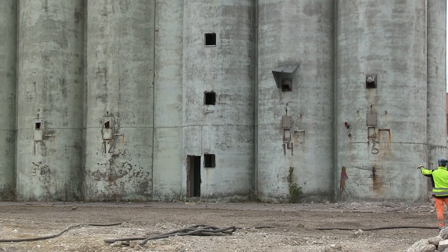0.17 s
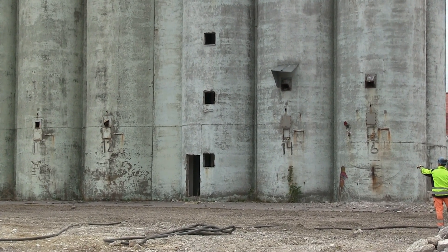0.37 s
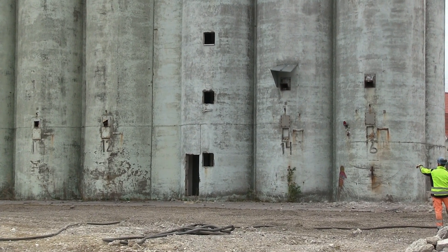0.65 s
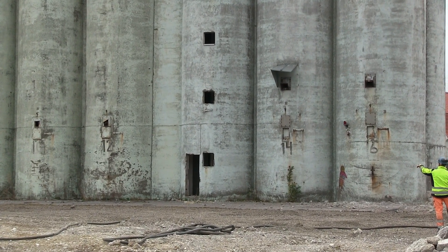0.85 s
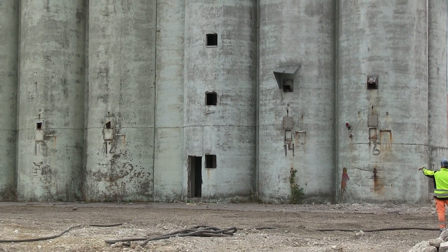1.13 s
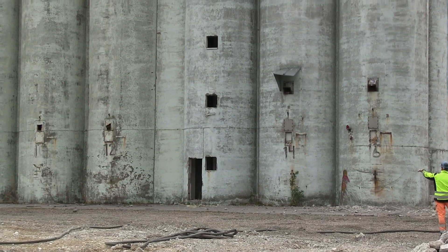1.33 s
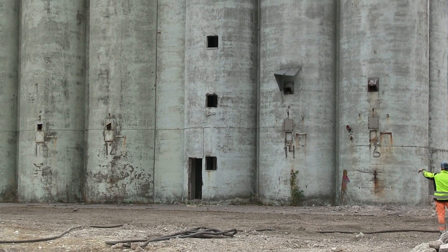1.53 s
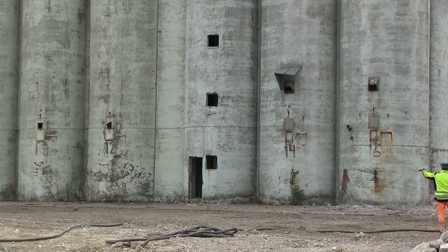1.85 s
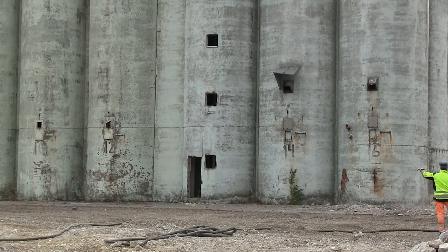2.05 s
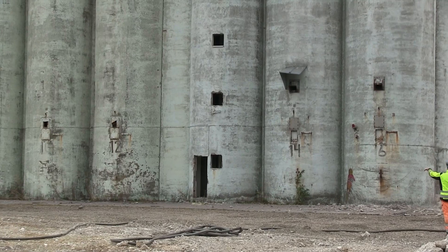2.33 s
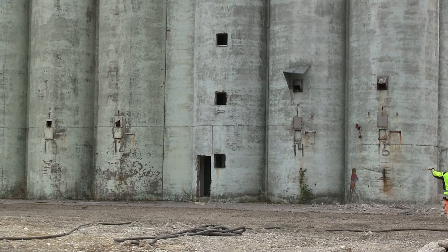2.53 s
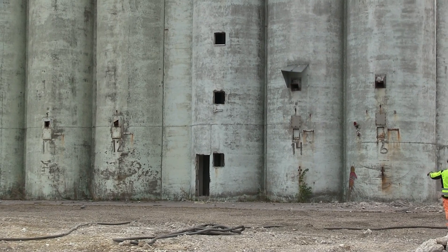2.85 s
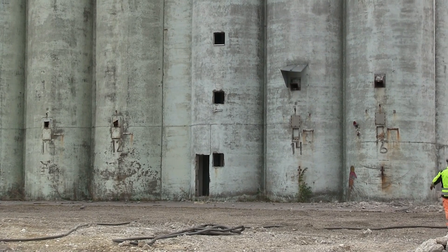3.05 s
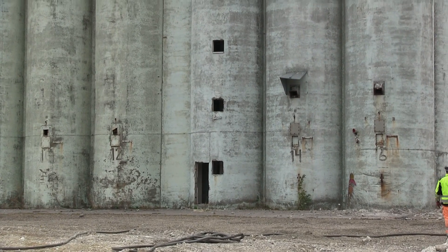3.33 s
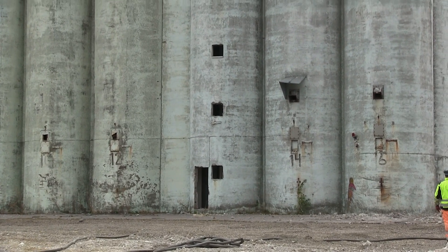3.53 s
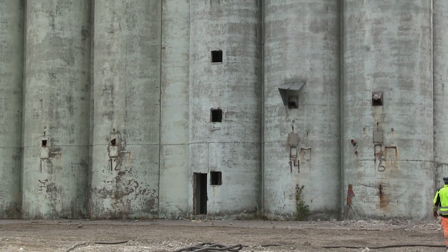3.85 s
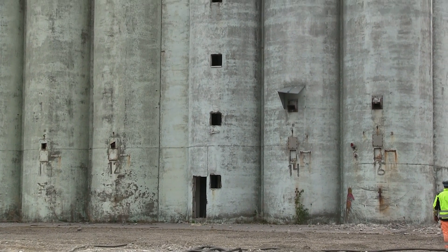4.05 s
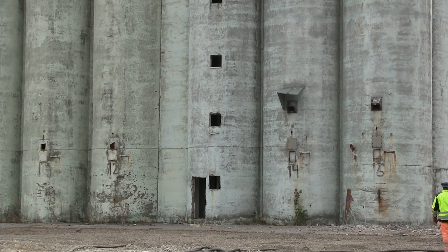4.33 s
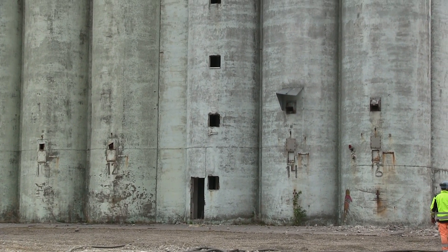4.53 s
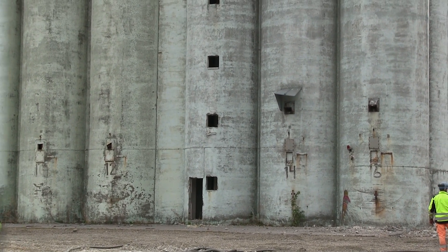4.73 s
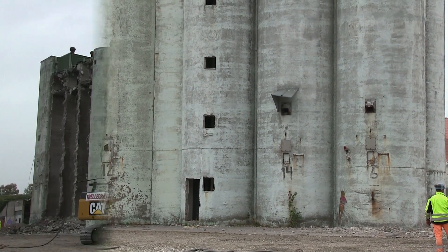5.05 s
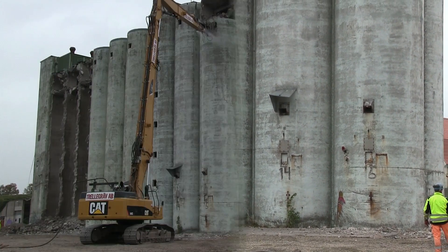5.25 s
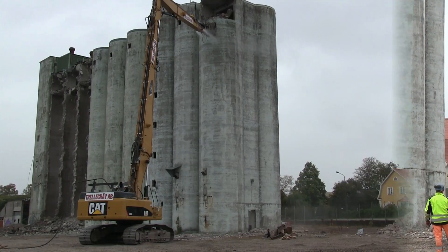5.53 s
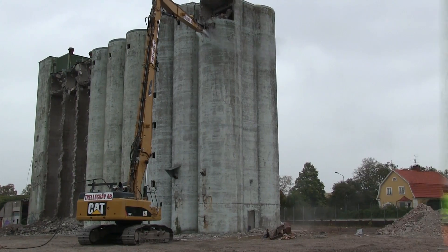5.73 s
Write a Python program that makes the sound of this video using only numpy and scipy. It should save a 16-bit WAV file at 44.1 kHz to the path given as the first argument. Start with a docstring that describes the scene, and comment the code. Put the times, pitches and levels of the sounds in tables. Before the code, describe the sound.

A high-reach machine crushes a silo outdoors, heard from across the yard. Dense rubble and snapping concrete come first, with a rough metallic squeal and grind, then sliding stones and low lump impacts. After about three and a half seconds only a light gritty hiss remains, broken by dry cracks that bunch up near the end, some with faint steel rings. Centred at first, then wider stereo.

```python
"""Rubble pours and grit hisses down a wall, then concrete snaps and heavy lumps thud on the ground:
a high-reach excavator crushes the top of a concrete silo, heard from across the yard.
Its steel jaws squeal, grind and clank, slabs scrape past and freed reinforcing bars ring.
Later the fall thins to a hiss of grit with sharp cracks, and the image widens.
Noise bursts and random impacts drive filters and resonances; steel tones are sums of sines."""
import sys
import numpy as np
from scipy import signal
from scipy.fft import rfft, irfft
from scipy.io import wavfile
from scipy.ndimage import uniform_filter1d, map_coordinates

SR = 44100
rng = np.random.default_rng(int(sys.argv[2]) if len(sys.argv) > 2 else 0)


def persist_wave(psi):
    """Save psi, clipped to +-1, as 16-bit WAV."""
    counts = np.round(np.clip(psi, -1, 1) * 32767).astype(np.int16)
    wavfile.write(sys.argv[1], SR, np.atleast_2d(counts).T)


N = 259303
T = np.arange(N) / SR


def undb(db):
    """Decibels to gain."""
    return 10 ** (np.asarray(db) / 20)


def unit(x):
    """Scale to rms 1."""
    return x / np.sqrt(np.mean(x ** 2) + 1e-18)


def curves(table):
    """The columns after time of a table, interpolated at every sample."""
    s, *columns = np.transpose(table)
    return [np.interp(T, s, column) for column in columns]


def colour_db(points, hz):
    """Read (frequency [Hz], level [dB]) points on a log-frequency axis."""
    f, db = np.transpose(points)
    return np.interp(np.log(hz + 1), np.log(f), db)


def shape(x, gain):
    """Causal minimum-phase filter whose magnitude is gain(Hz), built from the cepstrum."""
    size = 2048
    hz = np.arange(size // 2 + 1) * SR / size
    cepstrum = irfft(np.log(gain(hz) + 1e-6))
    # fold the cepstrum onto positive time
    cepstrum[1:size // 2] *= 2
    cepstrum[size // 2 + 1:] = 0
    response = irfft(np.exp(rfft(cepstrum)))
    return signal.fftconvolve(x, response)[:len(x)]


def tint(x, points):
    """Give x the colour of (frequency [Hz], level [dB]) points."""
    return shape(x, lambda hz: undb(colour_db(points, hz)))


def highpass(x, order, hz):
    """Butterworth filter that removes the bass."""
    return signal.sosfilt(signal.butter(order, hz, "high", fs=SR, output="sos"), x)


def fade(t, t60):
    """Exponential decay that falls 60 dB in t60 seconds."""
    return np.exp(-np.log(1000) * t / t60)


def walk(rate):
    """Random levels held 1 / rate s and slewed; rms 1 after trimming."""
    hold = max(int(SR / rate), 1)
    steps = np.repeat(rng.standard_normal(N // hold + 1), hold)
    return unit(uniform_filter1d(steps, hold)[:N])


def add(out, s, sound):
    """Mix a sound in at time s."""
    i = max(int(s * SR), 0)
    out[i:i + len(sound)] += sound[:N - i]


def together(*gains):
    """Unrelated sounds add in power."""
    return np.sqrt(sum(gain ** 2 for gain in gains))


def resonances(modes, hz):
    """Power response of (frequency [Hz], width [Hz], level [dB]) resonances."""
    return sum(undb(2 * db) / (1 + (2 * (hz - f) / width) ** 2) for f, width, db in modes)


def impacts(rate, scatter_db):
    """Random collisions, rate per second on average, with exponentially scattered levels."""
    hit = rng.random(N) < rate / SR
    size = np.minimum(rng.exponential(size=N), 4)
    sign = rng.choice([-1, 1], N)
    return unit(hit * undb(scatter_db * size) * sign)


def shower(points, rate, scatter_db, t60, flicker_db):
    """Four groups of fragments collide; each has its own short, irregular ring and flickering level."""
    t, out = T[:SR // 8], 0
    for _ in range(4):
        ring = unit(rng.standard_normal(len(t)) * fade(t, t60))
        hits = signal.oaconvolve(impacts(rate, scatter_db), ring)[:N]
        out = out + hits * undb(flicker_db * walk(25))
    return unit(tint(out, points))


# the steady pour of rubble, which all but runs out past halfway: (time [s], level [dB])
POUR_LEVEL = [(0, -31), (.9, -35.5), (1.2, -31), (3.1, -34), (3.5, -41.5), (3.7, -89), (4.4, -75.5),
              (5.88, -66)]
# slides of loosened rubble swell and die away:
# (time of peak [s], stones level [dB], lumps level [dB], t60 [s])
RUBBLE_SLIDES = [(.62,-20,-25.5,0.62), (1.24,-40,-31.5,1.1), (1.66,-26,-56,6.7), (2.04,-23,-40,1),
                 (2.61,-20.5,-30.5,0.81), (2.78,-30.5,-20.5,0.22), (2.99,-59,-25.5,1.06)]
SLIDE_RISE_S = 0.15
POUR_STONES_DB = 2.5  # stones relative to the pour


def flow():
    """Strength of falling stones and lumps: the steady pour plus each slide."""
    pour = undb(curves(POUR_LEVEL)[0])
    stones, lumps = pour * undb(POUR_STONES_DB), pour
    for s, stones_db, lumps_db, t60 in RUBBLE_SLIDES:
        rise = np.exp(-(np.minimum(T - s, 0) / SLIDE_RISE_S) ** 2)
        swell = rise * fade(np.maximum(T - s, 0), t60)
        stones = together(stones, undb(stones_db) * swell)
        lumps = together(lumps, undb(lumps_db) * swell)
    return stones, lumps


# colour of heavy lumps: (frequency [Hz], level [dB])
LUMP_COLOUR = [(25, -29), (70, -25.5), (115, -21.5), (180, -8), (310, 0), (480, -4.5), (800, -7.5),
               (1600, -59.5)]
# colour of stones: (frequency [Hz], level [dB])
STONE_COLOUR = [(220, -64), (350, -28.5), (520, -5), (780, -1.5), (1350, -3), (2000, -8.5), (3200, -12),
                (6000, -16.5), (12000, -53)]
# the trickle that runs throughout: (time [s], stones level [dB], grit level [dB])
TRICKLE_LEVELS = [(0, -45, -32.5), (.9, -41, -41), (1.4, -28, -31.5), (3.5, -84, -33.5),
                  (4.15, -56.5, -33.5), (5.1, -40, -33.5), (5.88, -60, -33)]


def rubble():
    """Dense random collisions make lumps rumble dully and stones clatter with a longer ring."""
    stone_flow, lump_flow = flow()
    stone_flow = together(stone_flow, undb(curves(TRICKLE_LEVELS)[0]))
    lumps = shower(LUMP_COLOUR, rate=150, scatter_db=-2.0, t60=0.016, flicker_db=2.0)
    stones = shower(STONE_COLOUR, rate=160, scatter_db=0.5, t60=0.08, flicker_db=3.0)
    return lumps * lump_flow + stones * stone_flow


# colour of fine grit: (frequency [Hz], level [dB])
GRIT_COLOUR = [(400, -50), (900, -9.5), (1800, 1.5), (3000, -1), (5000, -4), (8000, -7), (10500, -13.5),
               (13000, -20), (16000, -34)]
SHED_GRIT_DB = -10.5  # grit relative to the moving rubble
JAW_GRIT_DB = -9  # grit ground off, relative to the level of the jaws


def grit():
    """Fine grit hisses down the wall, more of it when rubble moves or the jaws grind."""
    trickle = undb(curves(TRICKLE_LEVELS)[1])
    shed = undb(SHED_GRIT_DB) * together(*flow())
    ground = undb(curves(GRIND_LEVEL)[0] + JAW_GRIT_DB)
    hiss = shower(GRIT_COLOUR, rate=700, scatter_db=1.0, t60=0.027, flicker_db=2.0)
    return hiss * together(trickle, shed, ground)


# colour of faint air on the microphone ports: (frequency [Hz], level [dB])
AIR_COLOUR = [(25, 2), (120, -2.5), (300, -12), (1000, -37)]
AIR_DB = -77.5  # centre of a slowly wandering level


def air():
    """Each port catches its own faint, slowly wavering rumble of moving air."""
    ports = []
    for _ in range(2):
        rumble = unit(tint(rng.standard_normal(N), AIR_COLOUR))
        ports.append(rumble * undb(AIR_DB + 2 * walk(2.3)))
    return np.array(ports)


def ringing(x, main_hz, ring_t60=0.072, ring_db=-13, main_db=-16, main_width_hz=260):
    """An irregular piece of concrete rings in a main resonance and many chance modes of its own."""
    t = T[:SR // 20]
    # one mode somewhere in each tenth of an octave; higher modes die sooner
    hz = 650 * 2 ** ((np.arange(40)[:, None] + rng.random((40, 1))) / 10)
    decay = fade(t, ring_t60 * np.sqrt(3000 / hz))
    modes = rng.standard_normal((40, 1)) * hz * np.sin(2 * np.pi * hz * t) * decay
    modes = modes.sum(0)
    main = np.sin(2 * np.pi * main_hz * t) * np.exp(-np.pi * main_width_hz * t)
    response = undb(ring_db) * modes / np.linalg.norm(modes)
    response += undb(main_db) * main / np.linalg.norm(main)
    return 0.6 * x + signal.fftconvolve(x, response)[:len(x)]


# overall colour of a crack: (frequency [Hz], level [dB])
CRACK_COLOUR = [(40, -16), (200, 0), (450, -29), (900, -9), (2500, 2), (4500, -1.5), (8000, -5.5),
                (11000, -15.5), (16000, -34.5)]


def crack(body_db, bright_db, main_hz, hold_s, t60, snap=0.57, snap_s=0.0015,
          body_lag_share=0.309, tail_db=-29, tail_t60=0.98, ragged_db=2.5, burst_db=-4):
    """A hard snap runs on as a burst of tiny fractures; the slab answers lower and later."""
    t = T[:SR // 5]
    # noise whose level jumps every millisecond
    steps = np.repeat(rng.standard_normal(len(t) // 10), SR // 1000)[:len(t)]
    snaps = unit(rng.standard_normal(len(t)) * undb(ragged_db * steps))
    onset = 1 + snap * np.exp(-t / snap_s)
    burst = undb(burst_db) * snaps * onset * fade(np.maximum(t - hold_s, 0), t60)
    tail = undb(tail_db) * rng.standard_normal(len(t)) * fade(t, tail_t60)
    fracture = ringing(burst + tail, main_hz)
    edge = tint(fracture, [(200, -25), (450, -21), (1000, 4.5), (1700, 3.5), (4200, 6),
                           (7500, bright_db + 15.0)])
    slab = tint(fracture, [(300, body_db - 19.5), (650, body_db + 17), (1100, body_db + 6.5),
                           (1700, body_db), (3000, body_db - 41.0)])
    lag = int(abs(body_lag_share * hold_s) * SR)
    return tint(edge + np.pad(slab, (lag, 0))[:len(t)], CRACK_COLOUR)


# snapping concrete: (time [s], level [dB], relative body [dB], relative brightness [dB],
# main resonance [Hz], length of the fracture [s])
SNAPPING_CONCRETE = [(.0795,-9,4.5,-18,3380,0.0059), (.243,-14,-19,-19,3240,0.0043),
                     (.2944,-16,-9,-24,2560,.004), (.495,-15.5,4,-14,815,0.0063),
                     (.609,-14,8,-30,4040,0.0073), (.896,-26.5,22.5,-14,6460,0.0026),
                     (1.2467,-14,3,-3,4630,0.0081), (1.3755,-2.5,1.5,-10.5,2240,.011),
                     (1.4259,-10,6,-17,1400,0.0068), (1.4595,-10.5,0,-17,2700,0.015),
                     (1.622,-10.5,3,-19,1500,0.0066), (1.9003,-1.5,10.5,-21.5,2140,0.0036),
                     (1.917,-19,13,-27,1190,0.0086), (2.011,-15,2,-10,2700,0.0044),
                     (2.017,-5,11.5,-27,1620,0.0045), (2.1473,-13.5,-14,-1.5,6200,.002),
                     (2.16,-22,-16,-3,6200,0.0025), (2.3042,-7,1,-15.5,1620,.009),
                     (2.3665,-10.5,3,-11,2910,0.0036), (2.3865,-8,-10,-10,3070,0.009),
                     (2.6302,-7,-6,-10,1360,0.0065), (2.9027,-17,-10,-7,6500,0.0055),
                     (3.092,-19.5,-15,-27,3360,.006), (3.3605,-18,7.5,-33,1530,0.0035),
                     (3.449,-28,-20,3.5,7760,.006), (3.506,-16.5,-18,-24,2700,.004),
                     (3.6822,-8.5,-27,-15.5,2470,.003), (3.866,-7,-10,-14,3480,0.0044),
                     (4.3875,-16.5,-28,-6.5,3990,0.0055), (4.706,-19.5,-16,-2.5,4630,0.0044),
                     (4.806,-16.5,-17,-14,2000,0.0073), (4.9555,-18,-25,-4,4840,.005),
                     (5.0094,-22,-18,-12,4700,0.0036), (5.1028,-12.5,-24,-5.5,4800,0.0044),
                     (5.1382,-10.5,-25,-5,2200,0.0052), (5.1992,-6.5,-25,-5,6000,0.0072),
                     (5.2694,-21.5,-24,-5,4470,0.019), (5.3355,-6,1,-13.5,2610,.011),
                     (5.53,-17.5,-24,-18,2020,.006), (5.548,-18.5,-21,-11,3750,0.0067),
                     (5.5919,-16,-20,-16,2940,.005), (5.6043,-9.5,-17,-17.5,2530,0.0067),
                     (5.6279,-14,-11,-11.5,2500,0.0058), (5.666,-18.5,-24,-10,4300,0.0055),
                     (5.6925,-10,-18,-7.5,4100,0.0045), (5.7275,-12.5,-20,-12.5,3950,.004),
                     (5.8408,-21,-12,-9.5,2460,0.0067)]
CRACK_T60_S = 0.096  # decay at a brightness of 0 dB
# dull, heavy pieces stop sooner than bright splinters: brightness that doubles the decay
DECAY_DB_PER_DOUBLING = 26
# small chips break off at random
CHIP_COUNT, CHIP_DB, CHIP_SPREAD_DB = 18, -30.5, 5.5
CHIP_BODY_DB, CHIP_BRIGHT_DB = -11, -19
CHIP_HZ = 2540  # resonance of the largest chip; smaller ones ring higher
CHIP_HOLD_S = 0.0042  # length of a chip's fracture


def cracks(from_s=0):
    """Large pieces break with their own weight, brightness and length; chips snap off in between."""
    out = np.zeros(N)
    chips = []
    for k, (when, size) in enumerate(rng.random((CHIP_COUNT, 2))):
        s = (k + when) * N / SR / CHIP_COUNT
        db = CHIP_DB + CHIP_SPREAD_DB * (2 * size - 1)
        hz = CHIP_HZ * 2 ** (1 - size)
        chips.append((s, db, CHIP_BODY_DB, CHIP_BRIGHT_DB, hz, CHIP_HOLD_S))
    for s, db, body_db, bright_db, main_hz, hold_s in list(SNAPPING_CONCRETE) + chips:
        if s >= from_s:
            t60 = CRACK_T60_S * 2 ** (bright_db / DECAY_DB_PER_DOUBLING)
            add(out, s, undb(db) * crack(body_db, bright_db, main_hz, hold_s, t60))
    return out


# heavy lumps landing: (time [s], level [dB], pitch [Hz])
LUMP_LANDINGS = [(0.3011,-10,290), (1.433,-12,570), (1.448,-15,265), (2.679,-13,228), (2.707,-7.5,253),
                 (2.726,-12,220), (2.765,-27,444), (2.788,-7.5,407), (2.7953,-4.5,284), (2.916,-10.5,216),
                 (2.995,-12.5,400), (3.042,-12,380), (3.091,-11.5,422), (3.129,-17,415)]
THUD_T60_S = 0.36  # decay of the crumbling


def thuds(contact_s=0.0028, crumble_db=-12, lowest_hz=110):
    """A lump lands with one heavy, quickly damped push, then crumbles in a short low rumble."""
    out, t = np.zeros(N), T[:SR // 4]
    for s, db, pitch in LUMP_LANDINGS:
        contact = (t / contact_s * np.exp(1 - t / contact_s)) ** 2
        push = np.sin(2 * np.pi * pitch * t) * contact

        def band(hz):
            """Resonant band around the pitch of the lump."""
            return 1 / (1 + ((hz + 1) / pitch - pitch / (hz + 1)) ** 2)
        crumbs = shape(rng.standard_normal(len(t)) * fade(t, THUD_T60_S), band)
        thud = push + undb(crumble_db) * crumbs / np.abs(crumbs).max()
        add(out, s, undb(db) * highpass(thud, 2, lowest_hz))
    return out


# steel squeals as the jaws take hold: (time of peak [s], level [dB], pitch [Hz], rise [s])
JAW_SQUEALS = [(.513,-16,780,0.012), (.96,-22.5,675,0.014), (1.025,-23.5,1170,0.043),
               (1.068,-15.5,1150,.025), (1.096,-18.5,610,0.035), (1.14,-17,1155,0.042),
               (1.169,-8,795,0.022), (1.233,-8,784,0.0093)]


def squeals(release_s=0.0071, waver=0.016, rough_db=3.0, overtone_db=-17):
    """Slipping steel squeals: a rough, wavering harmonic tone builds up and breaks off."""
    out = np.zeros(N)
    wander = np.cumsum(1 + waver * walk(150)) / SR
    rough = undb(rough_db * walk(200))
    for s, db, hz, rise in JAW_SQUEALS:
        near = np.abs(T - s) < .2
        t, phase = T[near] - s, 2 * np.pi * hz * wander[near]
        # overtone_db is the tilt per octave
        tone = sum(undb(overtone_db * np.log2(k)) * np.sin(k * phase) for k in range(1, 6))
        swell = np.exp(-(t / np.where(t < 0, rise, release_s)) ** 2)
        out[near] += undb(db) * tone * rough[near] * swell
    return out


# slabs scraping past: (time [s], level [dB], treble edge [Hz], swell [s], t60 [s])
SLAB_SCRAPES = [(.55,-23.5,2470,0.043,0.34), (.715,-19.5,2940,0.028,.34), (1.611,-14,4530,0.0072,0.84),
                (1.715,-22.5,4400,0.012,0.63), (1.972,-16.5,4300,0.016,0.25), (2.505,-16,3700,0.004,0.24),
                (2.57,-23.5,2490,0.1,0.47)]
# resonances that a scraping slab excites: (frequency [Hz], width [Hz], level [dB])
SLAB_RESONANCES = [(660,49,-0.5), (926,51,3), (1140,70,-4.5), (1340,33,0.5), (1507,20,3), (1990,76,-1.5),
                   (2510,38,0.5), (2750,75,-0.5), (3246,31,1.5), (3830,35,0), (4110,47,0), (4960,60,-5)]


def scrapes(slip_rate=1300, slip_db=2.5, rasp_db=-25):
    """A sliding slab catches and slips many times and rings; treble fades above its edge frequency."""
    out, t = np.zeros(N), T[:SR // 2]
    for s, db, edge_hz, swell, t60 in SLAB_SCRAPES:
        hit = rng.random(len(t)) < slip_rate / SR
        slips = rng.choice([-1, 1], len(t)) * hit * undb(slip_db * rng.standard_normal(len(t)))

        def body(hz):
            """Slab resonances over a broad rasp, limited at both ends."""
            power = resonances(SLAB_RESONANCES, hz) + undb(2 * rasp_db)
            treble_cut = 1 + (hz / edge_hz) ** 6
            bass_cut = 1 + (550 / (hz + 1)) ** 6
            return np.sqrt(power / treble_cut / bass_cut)
        rasp = unit(shape(slips, body))
        envelope = np.minimum(t / swell, 1) * fade(np.maximum(t - swell, 0), t60)
        add(out, s, undb(db) * rasp * envelope)
    return out


# struck steel: reinforcing bars, and at 5.139 s a knock on the jaws played the same way: # (time [s], level
# [dB], lowest mode [Hz], t60 [s], tilt [dB per octave])
STRUCK_BARS = [(0.834,-31,3290,0.22,-12), (3.507,-32,2580,0.54,-2.5), (3.686,-21.5,2480,0.099,0),
               (3.867,-26.5,2524,0.2,-14), (4.812,-38,1935,0.23,-23), (4.957,-31.5,2384,0.21,-25),
               (5.139,-24,2510,0.17,-20), (5.559,-28,2510,0.07,-12), (5.607,-26,2507,0.18,-8),
               (5.804,-34.5,2590,0.078,-12)]
# modes of a bar: (frequency ratio, level [dB])
BAR_MODE_RATIOS = [(1, 7), (1.284, 1.5), (1.54, -10), (1.79, 1)]


def bars():
    """Freed steel bars ring in a few inharmonic modes and radiate no bass."""
    out, t = np.zeros(N), T[:SR // 2]
    for s, db, hz, t60, tilt_db in STRUCK_BARS:
        ring = 0
        for ratio, mode_db in BAR_MODE_RATIOS:
            gain = undb(mode_db + tilt_db * np.log2(ratio))
            ring = ring + gain * np.sin(2 * np.pi * hz * ratio * t)
        add(out, s, undb(db) * ring * fade(t, t60))
    return highpass(out, 4, 700)


# jaws grinding through the wall: (time [s], level [dB])
GRIND_LEVEL = [(.94, -35), (1.04, -29), (1.056, -23), (1.12, -14), (1.167, -14.5), (1.2, -18), (1.232, -15),
               (1.27, -27), (1.311, -50)]
# resonances of jaws and wall: (frequency [Hz], width [Hz], level [dB])
JAW_RESONANCES = [(560,43,8), (603,22,5), (670,40,5), (778,18,10), (862,20,2), (953,21,10.5), (1156,22,2),
                  (1343,25,3.5), (1537,29,-0.5), (2300,77,-4), (2590,62,-6), (3480,38,-8), (4020,67,-8),
                  (4560,53,-20), (5740,130,-7), (7050,65,-10), (8700,110,-13), (9900,300,-16.5)]
# the resonances rise as the jaws press harder (share of pitch per s)
JAW_GLIDE_PER_S = 0.1575


def grinding(rasp_db=-31, judder_hz=170, judder_db=2.0, even_s=0.02):
    """Dense, juddering slips of steel on concrete drive the rising resonances of jaws and wall."""
    def body(hz):
        """Resonances over a broad rasp."""
        rasp = undb(2 * rasp_db) / (1 + (hz / 7000) ** 2)
        cuts = 1 + (420 / (hz + 1)) ** 4 + (hz / 12000) ** 8
        return np.sqrt(resonances(JAW_RESONANCES, hz) + rasp) / cuts
    slips = unit(shape(impacts(rate=1500, scatter_db=2.0), body))
    start, end = GRIND_LEVEL[0][0], GRIND_LEVEL[-1][0]
    # reading the sound ever faster raises its pitch
    from_middle = np.clip(T, start, end) - (start + end) / 2
    glide = T + JAW_GLIDE_PER_S * from_middle ** 2 / 2
    sound = map_coordinates(slips, [glide * SR], mode="mirror")
    # the steady push of the jaws holds the loudness; only the quick judder is left to chance
    even = sound / np.sqrt(uniform_filter1d(sound ** 2, int(even_s * SR)) + 1e-9)
    judder = undb(judder_db * np.tanh(walk(judder_hz)))
    return ((T > start) & (T < end)) * even * judder * undb(curves(GRIND_LEVEL)[0])


# pieces knock on the steel jaws: (time [s], level [dB])
JAW_KNOCKS = [(1.903, -22.5), (3.869, -33), (5.203, -21)]
# what the jaws ring with when knocked: (frequency [Hz], level [dB], t60 [s])
KNOCKED_JAW_MODES = [(963,0.5,0.25), (1556,-3,0.2), (1900,2,0.16), (2150,10.5,0.069), (2490,-3.5,0.3),
                     (3950,-2,0.11), (4450,-4,0.074), (4673,-12,0.18)]


def clanks(bloom_cycles=10):
    """Knocked jaws ring in many modes, the low ones blooming later, and radiate no bass."""
    out, t = np.zeros(N), T[:SR // 2]
    for s, db in JAW_KNOCKS:
        ring = 0
        for hz, mode_db, t60 in KNOCKED_JAW_MODES:
            bloom = 1 - np.exp(-(hz * t / bloom_cycles) ** 2)
            ring = ring + undb(db + mode_db) * np.sin(2 * np.pi * hz * t) * fade(t, t60) * bloom
        add(out, s, ring)
    return highpass(out, 4, 700)


# spread between the ears: (frequency [Hz], side minus mid [dB])
EAR_SPREAD = [(700, -40), (1400, -58), (2500, -12), (4400, -4.5), (8000, -2), (13000, 1.5)]
# image of the scene: (time [s], width [dB], left minus right [dB])
STEREO_IMAGE = [(3.42, -45, 0), (3.58, 2.5, 1.5)]


def scene(scattered_cracks_db=-3):
    """All sources lie ahead; scattered treble widens the image once the fall has thinned."""
    mid = rubble() + grit() + cracks() + thuds() + squeals() + scrapes() + bars() + grinding() + clanks()
    width_db, pan_db = curves(STEREO_IMAGE)
    # scattered sound keeps the listed timing of the direct sound but not its waveform
    scattered = grit() + undb(scattered_cracks_db) * cracks(from_s=STEREO_IMAGE[0][0])
    side = tint(scattered, EAR_SPREAD) * undb(width_db)
    panned = mid * undb(np.array([pan_db, -pan_db]) / 2)
    return panned + np.array([side, -side]) + air()


TOP_HZ = 15800


def record(dry):
    """The recorder rounds the highest peaks and cuts the treble above TOP_HZ."""
    rounded = dry / (1 + (dry / .92) ** 8) ** (1 / 8)
    return signal.sosfilt(signal.ellip(8, .2, 70, TOP_HZ, fs=SR, output="sos"), rounded)


dry = scene()
out = record(dry)
persist_wave(out)
```